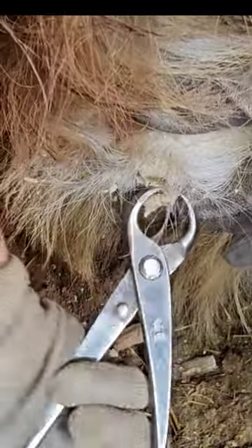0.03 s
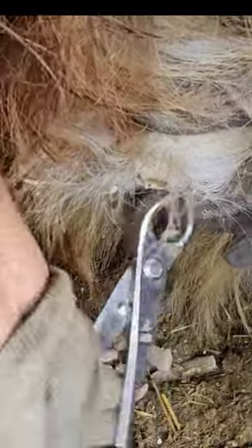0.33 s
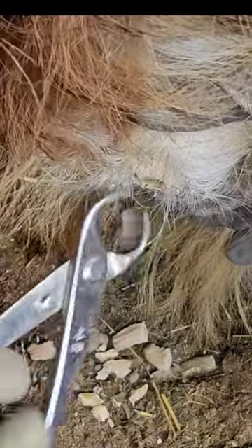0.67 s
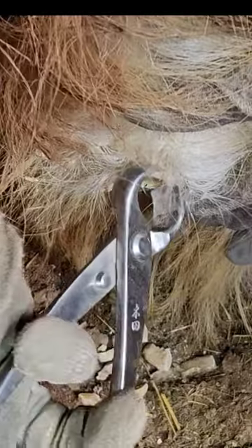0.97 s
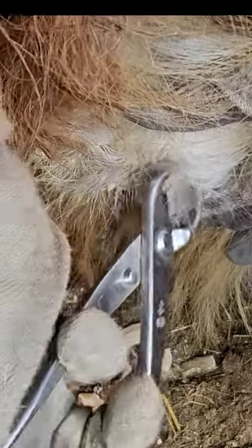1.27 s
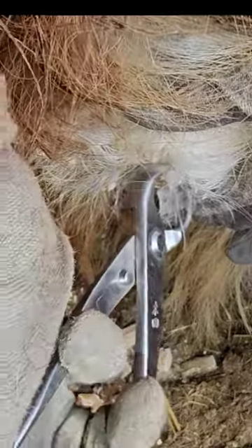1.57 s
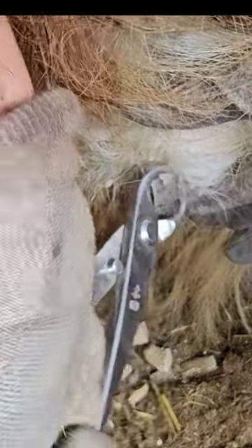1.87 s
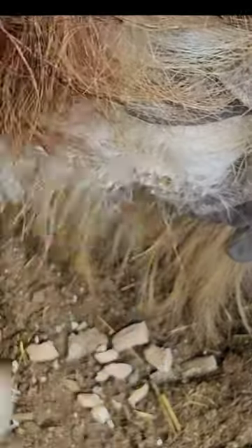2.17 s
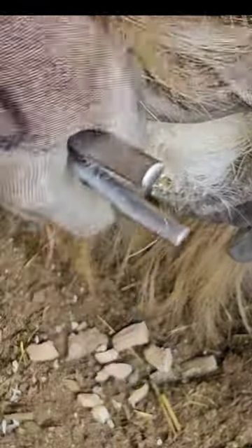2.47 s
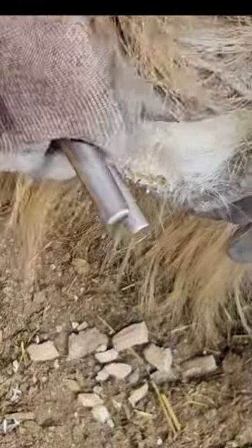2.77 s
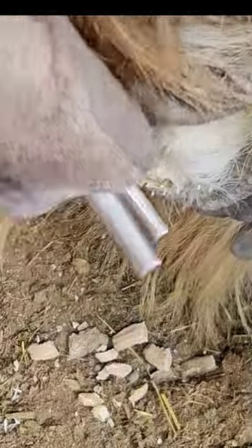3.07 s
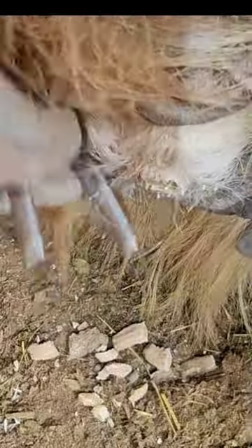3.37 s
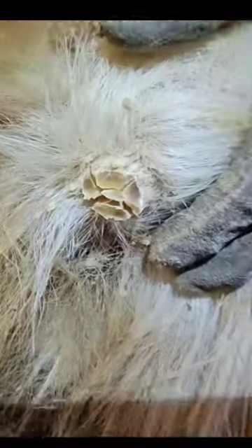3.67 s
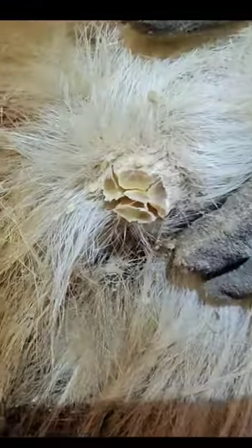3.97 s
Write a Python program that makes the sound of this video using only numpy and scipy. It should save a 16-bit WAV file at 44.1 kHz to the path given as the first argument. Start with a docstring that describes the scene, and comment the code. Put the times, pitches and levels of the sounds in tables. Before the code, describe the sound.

Steel nippers cut through a horny growth with one hard, close snap at about 0.4 seconds. The jaws tick lightly at 1.2 seconds, then scrape and slip off with a metallic clack at 2 seconds. A work glove rustles faintly and bumps softly, mostly from 2.3 to 3.6 seconds, where a small click sounds. Throughout, an engine drones low some way off, with a steady rush and a faint whistle.

```python
"""Steel nippers trim a horny growth on an animal's leg, close up: one hard snap, a tick of the jaws,
then a scrape and a clack as they slip off. Each blow is a noise crack plus damped horn or steel modes,
with a short wash in the stall. A work glove rustles and bumps. Some way off an engine or compressor
drones at multiples of its firing rate, over a steady rush and a faint whistle.
Near the end the sound drops out with a click and the background returns a little rougher."""
import sys
import numpy as np
from scipy import signal
from scipy.fft import rfft, irfft, next_fast_len
from scipy.io import wavfile
from scipy.ndimage import uniform_filter1d, map_coordinates

SR = 44100
rng = np.random.default_rng(int(sys.argv[2]) if len(sys.argv) > 2 else 0)


def transcribe(u):
    """Save the signal u as a 16-bit wav file named by the first command-line argument.

    u: samples, shape (n,) or (channels, n), limited to [-1, 1]; the rate is SR.
    q: integer samples, one column per channel.
    """
    v = np.clip(np.atleast_2d(u).T, -1, 1)
    q = np.round(v * 32767).astype(np.int16)
    wavfile.write(sys.argv[1], SR, q)


N = 176400

# left-right noise correlation: f/Hz, coefficient
CORRELATION = [(60, 0.97), (130, 1), (290, 0.68), (640, 0.39), (1410, -0.29), (3100, 0.31), (6820, 0.02),
               (15000, 0.19)]
# machine rush before and after the dropout: f/Hz, level/dB
RUSH_SPECTRUM = [(20, -72.5), (55, -66), (200, -63.5), (260, -66), (310, -71.5), (550, -70.5), (720, -77.5),
                 (1000, -81), (2000, -90), (3000, -100), (3900, -104.5), (4350, -102.5), (4800, -107),
                 (6200, -112.5), (8200, -129), (10400, -134), (11600, -120.5), (12800, -127), (15000, -127),
                 (15800, -136)]
LATE_RUSH_SPECTRUM = [(20, -75.5), (55, -67.5), (120, -58), (200, -59), (550, -71.5), (1000, -83),
                      (2000, -89.5), (4200, -104), (6200, -112), (8200, -131), (10500, -134),
                      (11600, -120.5), (12800, -128), (15800, -132)]
# whistle swells: t/s, half length/s, level/dB
WHISTLES = [(.02, .04, -68), (.28, 0.06, -73), (.95, .075, -71.5), (1.56, .06, -70), (1.9, 0.093, -74.5),
            (2.12, 0.059, -72), (2.68, 0.055, -69), (3.02, 0.055, -68.5), (3.35, .04, -71),
            (3.95, .05, -71.5)]
# engine firing rate: t/s, f/Hz
FIRING_RATE = [(0.0, 46), (0.04, 46.6), (0.13, 45.9), (1.31, 45.9), (3.62, 46.1)]
# engine orders: multiple of the firing rate, level/dB
ENGINE_ORDERS = [(1, -46.5), (2, -53.5), (3, -43.5), (4, -37.5), (5, -43.5), (7, -49.5), (11, -55.5),
                 (14, -63.5)]
# other machine tones: f/Hz, level/dB
MACHINE_TONES = [(162, -48), (252, -58), (437, -58.5), (839.8, -61)]
# reflection colour; wash after horn; wash after steel: f/Hz, level/dB
ROOM_SPECTRUM = [(300, 11), (2500, -1.5), (5000, 2), (11000, 7.5), (15000, 3.5)]
HORN_WASH_SPECTRUM = [(700, -90.5), (2000, -78.5), (3000, -87), (3800, -88.5), (5400, -83.5), (6300, -90.5),
                      (8700, -105), (11200, -99), (13000, -105), (14500, -103), (15800, -115)]
STEEL_WASH_SPECTRUM = [(1500, -100), (3200, -86.5), (5200, -98), (7100, -92.5), (8500, -111), (11200, -101),
                       (12800, -107), (14200, -101), (15800, -110)]
# glove strokes: t/s, half length/s, level/dB, share of low brushing 0-1
GLOVE_STROKES = [(.01, .04, -72.5, 0.8), (0.203, 0.058, -76.5, .6), (0.738, 0.023, -73.5, .5),
                 (1.113, 0.042, -75.5, .05), (2.322, 0.035, -66, 0.2), (2.501, 0.1, -74.5, 0.3),
                 (2.679, 0.035, -72.5, 0.6), (2.752, 0.033, -69, 0.2), (2.929, 0.033, -73, 0.3),
                 (3.162, 0.095, -75.5, .7), (3.379, 0.045, -76, 0.5), (3.535, 0.05, -74, 0.6),
                 (3.612, 0.025, -72, 0.4)]
# hand bumps; edges scraping horn; crumbs landing: t/s, half length/s, level/dB
BUMPS = [(1.555, 0.028, -38), (2.85, 0.016, -38), (2.96, 0.046, -37), (3.415, 0.022, -32.5)]
SCRAPES = [(1.955, .025, -72), (1.9622, 0.0012, -58), (1.9765, 0.003, -58), (1.9845, .0025, -52),
           (1.992, .0028, -50)]
CRUMBS = [(.535, .002, -60.5), (.5482, .0012, -58), (.653, 0.003, -61)]
# glove and tool noises: f/Hz, level/dB
HISS_SPECTRUM = [(2000, -12), (5000, -2), (7000, 1), (8600, -12.5), (9700, 1), (10400, -8.5), (11500, 5),
                 (13000, -3), (15000, -4.5)]
BRUSH_SPECTRUM = [(400, -9), (1500, 3.5), (3000, 3.5), (6000, -1), (8000, -17.5), (15000, -32.5)]
BUMP_SPECTRUM = [(25, -26.5), (50, 0.5), (68, 1), (95, -8.5), (160, -29), (500, -74)]
SCRAPE_SPECTRUM = [(1500, -16), (3500, -4.5), (5200, 5), (6200, -0.5), (7200, -4), (8600, -23),
                   (9800, -6.5), (11600, -6.5), (13000, -11.5), (15000, -10.5)]
CRUMB_SPECTRUM = [(1500, -11), (4000, 0), (5500, 4), (6600, 3), (8000, -17), (11000, -18), (15000, -23.5)]
CRACK_SPECTRUM = [(500, -18.5), (1200, -4.5), (6000, 6), (8500, -10.5), (15000, -9.5)]
# horn breaking: t/s, level/dB
SNAPS = [(0.414, 2)]
# horn modes: f/Hz, level/dB, t60/s, left-right/dB
HORN_MODES = [(1033, -26, 0.013, 9), (1630, -29.5, 0.015, 11.5), (2060, -25, 0.0056, 12),
              (2710, -16, 0.0077, -5), (3060, -16, 0.0054, -3.5), (4620, -20.5, .0055, 3),
              (5580, -27, 0.014, -5.5), (6500, -34, 0.0055, 5.5), (10370, -49.5, 0.0071, 3),
              (11200, -46, 0.0061, 0), (14200, -53.5, .007, 0.5)]
# jaw contacts: t/s, level/dB, freedom (0 on the horn, 1 free)
JAW_CONTACTS = [(1.247, 1, 0), (2.0257, 0.5, 1)]
# nipper modes: f/Hz, t60/s, left-right/dB, level on the horn/dB, level free/dB
STEEL_MODES = [(2025, 0.015, 7.5, -44, -37.5), (2990, 0.012, -7, -67, -32),
               (4450, 0.0055, 14.5, -51.5, -36.5), (4890, 0.013, -13, -39, -63.5),
               (5400, 0.0053, -8.5, -49, -31.5), (7180, 0.0055, 9, -46, -29),
               (9780, 0.018, -2, -60.5, -56.5), (11100, 0.0093, -1.5, -59, -45.5),
               (14200, 0.005, -7.5, -56, -39)]

DROPOUT_S, RETURN_S, RETURN_FADE_S = 3.6293, 3.6392, 0.0029


def amp(db):
    """Decibels to gain."""
    return 10 ** (np.asarray(db) / 20)


def unit(x):
    """Scale to rms 1."""
    return x / np.sqrt(np.mean(x ** 2) + 1e-30)


def clock():
    """Sample times in s."""
    return np.arange(N) / SR


def along(points, hz):
    """Interpolate (f/Hz, value) points on a log axis."""
    point_hz, values = np.transpose(points)
    return np.interp(np.log(hz + 1), np.log(point_hz + 1), values)


def pan(left_db):
    """Left and right gains for a level difference."""
    return amp(np.array([[left_db], [-left_db]]) / 2)


def wobble(rate_hz):
    """Smooth random curve, rate_hz knots a second."""
    return map_coordinates(rng.standard_normal(int(N * rate_hz / SR) + 4), [clock() * rate_hz])


def filtered(x, response):
    """Apply a frequency response."""
    size = next_fast_len(x.shape[-1] + SR // 4)
    return irfft(rfft(x, size) * response(np.fft.rfftfreq(size, 1 / SR)), size)[..., :x.shape[-1]]


def noise(spectrum):
    """Stereo noise from a density in dB per Hz; channels more alike in the bass."""
    def response(hz):
        width_rad = np.arccos(np.clip(along(CORRELATION, hz), -1, 1)) / 2
        return amp(along(spectrum, hz)) * [np.cos(width_rad), np.sin(width_rad)]
    mid, side = filtered(rng.standard_normal((2, N)), response)
    return np.sqrt(SR / 2) * np.array([mid + side, mid - side])


def swells(rows):
    """Power sum of bell envelopes: t/s, half length/s, level/dB."""
    t = clock()
    return np.sqrt(sum(amp(db) ** 2 * np.exp(-((t - at_s) / half_s) ** 2) for at_s, half_s, db in rows))


def machine_rush(waver_db=0.63):
    """Steady broadband rush; its spectrum switches at the dropout."""
    rush = np.where(clock() < DROPOUT_S, noise(RUSH_SPECTRUM), noise(LATE_RUSH_SPECTRUM))
    return rush * amp(waver_db * wobble(8))


def whistle(centre_hz=4317, width_hz=80):
    """Thin distant whistle: a narrow noise band that comes and goes."""
    white = rng.standard_normal((2, N))
    band = filtered(white, lambda hz: np.exp(-((hz - centre_hz) / width_hz) ** 2 / 2))
    return swells(WHISTLES) * unit(band)


def engine(order_waver_db=0.65, tone_waver_db=2.4, smear_rad=.72, late_db=-2.5, right_lag_s=.0003):
    """Wavering low orders of the firing rate, plus a few other machine tones."""
    t = clock()
    firing_hz = np.interp(t, *np.transpose(FIRING_RATE))
    firings = np.cumsum(firing_hz) / SR - np.array([[0], [right_lag_s]]) * firing_hz
    drone = tones = 0
    for order, db in ENGINE_ORDERS:
        gain = amp(db + order_waver_db * wobble(7.6))
        phase_rad = 2 * np.pi * order * firings - smear_rad * order ** 2  # exhaust spreads each pulse
        drone += gain * np.sin(phase_rad + 0.21 * wobble(9))
    for hz, db in MACHINE_TONES:
        gain = amp(db + tone_waver_db * wobble(8))
        tones += gain * np.sin(2 * np.pi * hz * t + 0.68 * wobble(4.03))
    return np.sqrt(2) * (drone * amp(late_db * (t > DROPOUT_S)) + tones)


def reflections(x, near_db=-9.5, room_db=-18):
    """Quick scatter from hand, leg and ground, then the stall's short tail."""
    t = np.arange(SR // 3) / SR
    def tail(t60_s, rise_s):
        burst = rng.standard_normal((2, len(t))) * amp(-60 * t / t60_s)
        burst *= 1 - np.exp(-(t / rise_s) ** 2)
        return burst / np.linalg.norm(burst, axis=1, keepdims=True)
    near = amp(near_db) * tail(t60_s=0.019, rise_s=0.0016)
    room = amp(room_db) * tail(t60_s=.19, rise_s=.006)
    impulse_response = filtered(near + room, lambda hz: amp(along(ROOM_SPECTRUM, hz)))
    return signal.fftconvolve(x, impulse_response, axes=1)[:, :N]


def wash(at_s, db, spectrum, t60_s=.245, rise_s=.005):
    """Diffuse reflections: build up after a blow, decay evenly."""
    age_s = np.maximum(clock() - at_s, 0)
    return noise(spectrum) * amp(db - 60 * age_s / t60_s) * (1 - np.exp(-(age_s / rise_s) ** 2))


def stall(held_db=-11):
    """Toneless wash after each snap and jaw contact; weaker for jaws held on the horn."""
    horn = sum(wash(at_s, db, HORN_WASH_SPECTRUM) for at_s, db in SNAPS)
    steel = sum(wash(at_s, db + (1 - free) * held_db, STEEL_WASH_SPECTRUM)
                for at_s, db, free in JAW_CONTACTS)
    return horn + steel


def friction(spectrum, grain_db, grain_hz):
    """Noise broken into tiny slips of uneven size."""
    return unit(noise(spectrum) * amp(grain_db * wobble(grain_hz)))


def glove(brush_db=12.5):
    """The weave catches, hisses and brushes over hair; the hand bumps softly."""
    def strokes(share):
        return swells([(at_s, half_s, db + 10 * np.log10(np.clip(share(low), .01, 1)))
                       for at_s, half_s, db, low in GLOVE_STROKES])
    hiss = strokes(lambda low: 1 - low) * friction(HISS_SPECTRUM, grain_db=1.5, grain_hz=420)
    brush = strokes(lambda low: low) * friction(BRUSH_SPECTRUM, grain_db=2.0, grain_hz=340)
    bumps = swells(BUMPS) * unit(noise(BUMP_SPECTRUM))
    return hiss + amp(brush_db) * brush + bumps


def scraping():
    """Cutting edges drag over the horn; crumbs land after the snap."""
    edges = swells(SCRAPES) * friction(SCRAPE_SPECTRUM, grain_db=6.5, grain_hz=1400)
    crumbs = swells(CRUMBS) * friction(CRUMB_SPECTRUM, grain_db=5.5, grain_hz=900)
    return edges + crumbs


def strike(at_s, modes, crack_db, crack_t60_s, right_lag_s):
    """Brief crack plus damped modes, arriving slightly later on the right."""
    live = slice(int(at_s * SR), int(at_s * SR) + SR // 10)
    age_s = np.maximum(clock()[live] - at_s - np.array([[0], [right_lag_s]]), 0)
    ring = sum((-1) ** k * pan(left_db) * amp(db - 60 * age_s / t60_s) * np.sin(2 * np.pi * hz * age_s)
               for k, (hz, db, t60_s, left_db) in enumerate(modes))
    crack = filtered(rng.standard_normal(age_s.shape), lambda hz: amp(along(CRACK_SPECTRUM, hz)))
    out = np.zeros((2, N))
    out[:, live] = ring + (age_s > 0) * amp(crack_db - 60 * age_s / crack_t60_s) * crack
    return out


def nippers(snap_crack_db=-29.5, jaw_crack_db=-51.5, free_boost_db=11.5):
    """The horn snaps; the steel jaws tick against it and clack when they come free."""
    out = np.zeros((2, N))
    for at_s, db in SNAPS:
        out += amp(db) * strike(at_s, HORN_MODES, snap_crack_db, crack_t60_s=.0034, right_lag_s=.000076)
    for at_s, db, free in JAW_CONTACTS:
        modes = [(hz, held_db + free * (free_db - held_db), t60_s, left_db)
                 for hz, t60_s, left_db, held_db, free_db in STEEL_MODES]
        crack_db = jaw_crack_db + free * free_boost_db
        out += amp(db) * strike(at_s, modes, crack_db, crack_t60_s=.0056, right_lag_s=.0001)
    return out


def scene():
    """Tool and glove up close; machine behind, slightly left."""
    tool = nippers() + scraping()
    foreground = tool + reflections(tool) + stall() + glove()
    background = engine() + machine_rush() + whistle()
    return foreground + pan(left_db=2) * background


def record(dry, dropout_db=-13.5, click_db=-27, click_decay_s=0.00034, cutoff_hz=15800):
    """Brief dropout with a click and a fade back in, then a brick-wall low-pass."""
    t = clock()
    started = t > DROPOUT_S
    release = np.clip((RETURN_S - t) / RETURN_FADE_S + .5, 0, 1)
    dip = uniform_filter1d(started * release, size=20)
    gate = 1 - dip * (1 - amp(dropout_db))
    click = -amp(click_db) * started * np.exp(-np.abs(t - DROPOUT_S) / click_decay_s)
    return filtered(dry * gate + click, lambda hz: hz < cutoff_hz)


dry = scene()
out = record(dry)
transcribe(out)
```